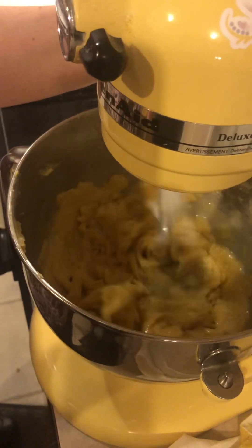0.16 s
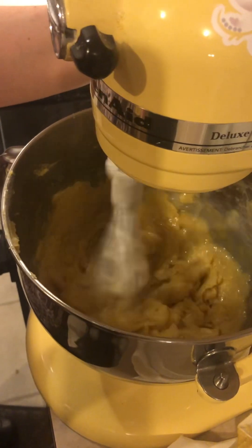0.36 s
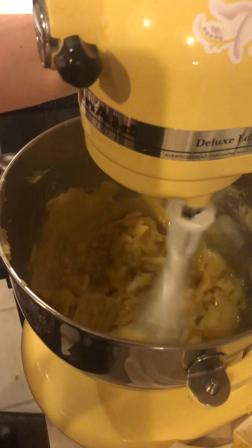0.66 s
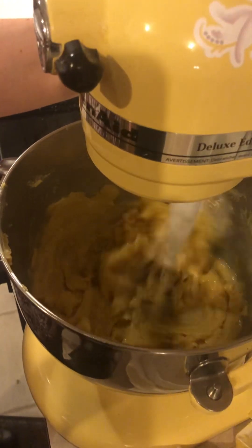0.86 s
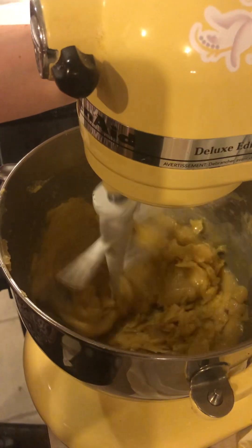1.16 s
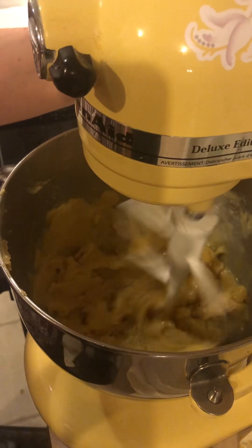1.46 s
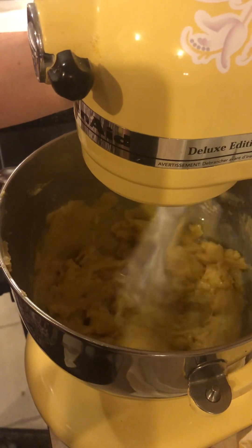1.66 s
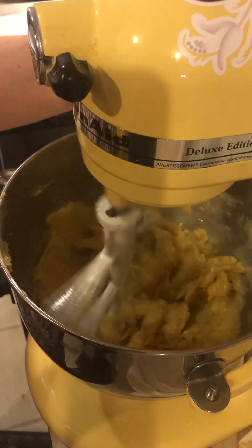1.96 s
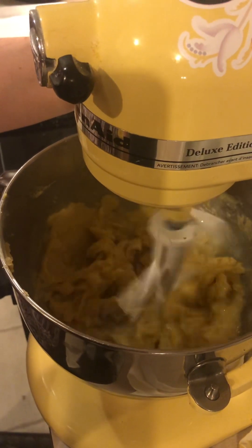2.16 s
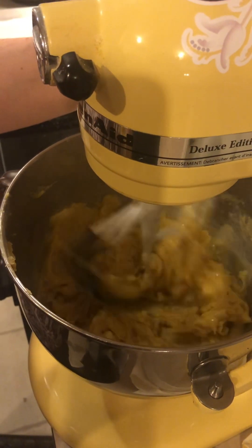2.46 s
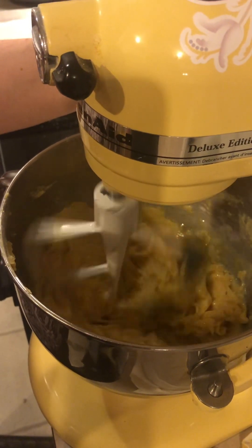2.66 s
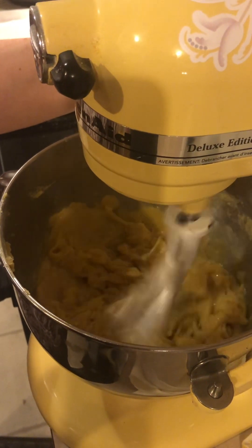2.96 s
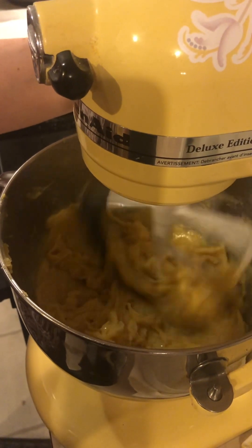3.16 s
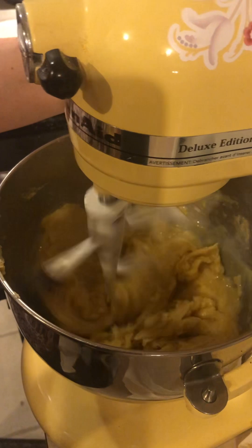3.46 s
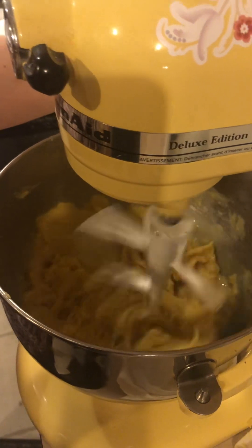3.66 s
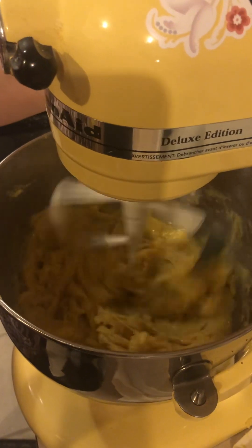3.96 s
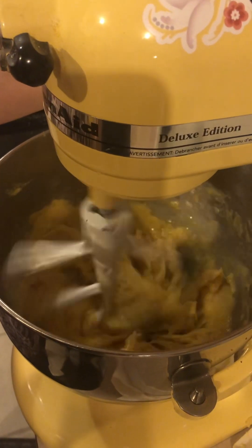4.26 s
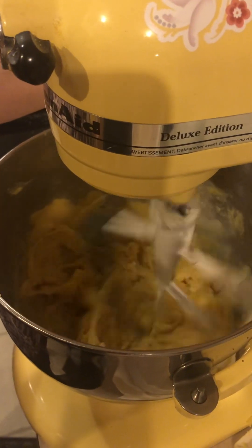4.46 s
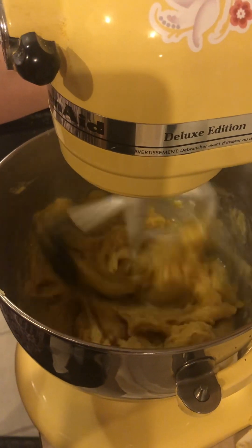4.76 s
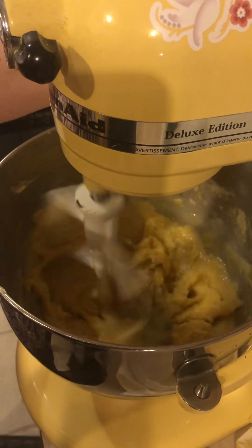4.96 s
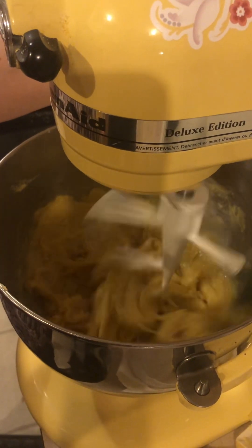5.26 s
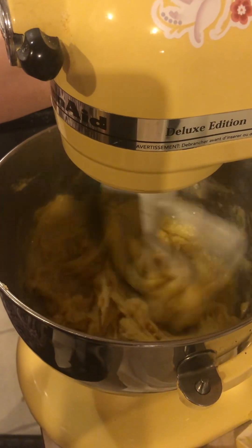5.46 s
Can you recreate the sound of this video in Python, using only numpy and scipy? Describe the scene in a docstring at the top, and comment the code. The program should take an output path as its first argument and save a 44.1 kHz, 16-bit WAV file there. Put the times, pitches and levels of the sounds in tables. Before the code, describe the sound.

An electric stand mixer is already running at the start and continues unbroken to the end, about 5.6 seconds, heard close and centred with only tiny reflections from the bowl and worktop. A piercing, slightly fluttering gear whine near 770 Hz dominates, with a weaker octave, rough higher overtones and many thin motor tones. It swells about every 0.77 seconds as the beater circles through thick dough. Pitch dips briefly on lumps, notably around 1.5, 2.3, 3.65 and 4.2 seconds, the 3.65 one swelling loudest; it jumps slightly higher near 1.2, 2.3, 3.6 and 4.25 as the blade slips free. A bright, grainy brush hiss with metallic housing ring lies over gear rattle, a low rush and faint electric hum. Small sticky dough smacks stay buried. One short, dull tick on the bowl comes at about 3.15 seconds. The whine grows gradually stronger towards the end.

```python
"""A stand mixer whines close by at one speed while its beater turns thick dough in a steel bowl.
The whine is gear teeth meshing: it swells once a lap, sags on lumps and races as a blade slips free.
Tones tied to the motor shaft and a fixed electric hum lie around it; the gears rattle and rush.
Brushes hiss as shaped noise and ring the housing, the dough smacks softly, and the beater ticks the bowl.
Short reflections from bowl and worktop colour the hiss and the tick."""
import sys
import numpy as np
from scipy import signal
from scipy.fft import rfft, irfft, next_fast_len
from scipy.io import wavfile
from scipy.ndimage import uniform_filter1d, map_coordinates

SR = 44100
rng = np.random.default_rng(int(sys.argv[2]) if len(sys.argv) > 2 else 0)


def persist_wave(psi):
    """Save psi, clipped to +-1, as 16-bit WAV."""
    counts = np.round(np.clip(psi, -1, 1) * 32767).astype(np.int16)
    wavfile.write(sys.argv[1], SR, np.atleast_2d(counts).T)


N = 247401  # length of the sound in samples

SHAFT_HZ = 76.67  # the motor shaft's set speed, turns a second
# The beater circles the bowl (laps a second) and meets the thickest dough once a lap, first at this time.
ORBIT_HZ, THICKEST_S = 1.303, 0.345
# The worm wheel turns once in six shaft turns; its one tight spot first comes round at this time.
WHEEL_HZ, WHEEL_S = SHAFT_HZ / 6, 0.053


def amp(db):
    """Turn decibels into a gain."""
    return 10 ** (np.asarray(db) / 20)


def unit(x):
    """Scale a signal to rms 1."""
    return x / np.sqrt(np.mean(x ** 2) + 1e-20)


def along(points, hz):
    """Read a curve of (Hz, value) points at any frequency, on a log frequency axis."""
    point_hz, value = np.transpose(points)
    return np.interp(np.log(hz + 1), np.log(point_hz + 1), value)


def wobble(rate):
    """A smooth random curve with rate random points a second."""
    position = np.arange(N) * rate / SR
    return map_coordinates(rng.standard_normal(int(N * rate / SR) + 4), [position])


def cycle(rate, peak_s):
    """A steady rotation as a swing between -1 and 1, with a peak at peak_s."""
    return np.cos(2 * np.pi * rate * (np.arange(N) / SR - peak_s))


def bump(s, half_s):
    """A smooth rise and fall around time s, down to 1/e at half_s to either side."""
    return np.exp(-((np.arange(N) / SR - s) / half_s) ** 2)


def filtered(x, response):
    """Shape x by a response given as a function of frequency."""
    m = next_fast_len(N + SR // 2)  # room for the ringing to die out
    return irfft(rfft(x, m) * response(np.fft.rfftfreq(m, 1 / SR)), m)[..., :N]


def noise(spectrum, gate=1):
    """Noise of rms 1, its strength shaped by gate and then its colour by (Hz, dB) points."""
    return unit(filtered(gate * rng.standard_normal(N), lambda hz: amp(along(spectrum, hz))))


def tone(phase, rough, flutter_rate):
    """A tone of rms 1 whose strength and phase flutter by the share rough."""
    steady = 1 + rough * (wobble(flutter_rate) + 1j * wobble(flutter_rate))
    return unit(np.real(steady * np.exp(1j * phase)))


def working(start_db, rise_db_per_s, orbit_db, lag_s, wander_db, wander_rate):
    """Level in dB of one part: it creeps up, and swells once a lap, lag_s after the thickest dough."""
    orbit = cycle(ORBIT_HZ, THICKEST_S + lag_s)
    creep_db = start_db + rise_db_per_s * np.arange(N) / SR
    return creep_db + orbit_db * orbit + wander_db * wobble(wander_rate)


def kneading():
    """Lumps brake the shaft and swell the whine; slips let it race and thin the tone.

    Gives the slowing [Hz], the racing [Hz], and the changes of whine and octave [dB]."""
    # The beater catches a lump:
    # (time [s], half-length [s], shaft slows by [Hz], whine swells by [dB])
    snags = [(0.82, 0.033, 0.37, 3), (1.0, 0.08, 0.17, 1.5), (1.521, 0.024, 0.67, 3.5),
             (1.846, 0.019, 0.38, 0), (2.063, 0.022, 0.3, 2.5), (2.339, 0.056, 0.92, 3.0),
             (2.583, 0.049, 0.41, 2), (3.38, 0.03, 0.48, 0.5), (3.65, 0.048, 1.64, 8),
             (3.952, 0.0803, 0.554, 2.2), (4.21, 0.056, 1.27, 4.5), (4.87, 0.021, 0.14, 2.0),
             (5.101, 0.028, 0.23, 2.5), (5.55, 0.051, 0.32, 1.3)]
    # A blade slips free of the dough: (time [s], shaft gains [Hz], whine's octave drops by [dB])
    slips = [(0.05, 0.24, 15), (0.24, 0.0058, 8.5), (0.46, 0.016, 4.3), (0.75, 0.04, 6.9), (1.16, 0.5, 1.7),
             (1.38, 0.02, 4), (1.98, 0.44, 4), (2.3, 0.73, 7), (2.75, 0.38, 10), (2.99, 0.0, 7.2),
             (3.26, 0.094, 13), (3.63, 1.0, 8), (3.81, 0.66, 5.5), (4.07, 0.22, 4), (4.24, 0.99, 6.4),
             (4.55, 0.15, 6), (5.04, 0.24, 10), (5.22, 0.11, 8)]
    slip_s = 0.055  # half-length of every slip
    slack_db_per_hz = 3.5  # the whine eases as the shaft runs free
    octave_db_per_hz = 2  # the teeth press harder as the shaft is slowed
    sag = sum(slows * bump(s, half_s) for s, half_s, slows, db in snags)
    swell_db = sum(db * bump(s, half_s) for s, half_s, slows, db in snags)
    race = sum(gains * bump(s, slip_s) for s, gains, db in slips)
    drop_db = sum(db * bump(s, slip_s) for s, gains, db in slips)
    whine_load_db = swell_db - slack_db_per_hz * race
    octave_load_db = octave_db_per_hz * sag - drop_db
    return sag, race, whine_load_db, octave_load_db


def gears(angle, sag, whine_load_db, octave_load_db):
    """The gears follow the beater's orbit, the load of the dough and the turn of the worm wheel."""
    wheel = cycle(WHEEL_HZ, WHEEL_S)
    whine_db = working(start_db=-25.5, rise_db_per_s=0.67, orbit_db=2.0, lag_s=0,
                       wander_db=0.58, wander_rate=22)
    # the whine pulses as the beater's edges sweep past the bowl wall
    edge_sweep_db = 0.67 * cycle(rate=7.53, peak_s=0.061)
    whine_db = whine_db + whine_load_db + edge_sweep_db
    octave_db = working(start_db=-37, rise_db_per_s=0.57, orbit_db=0.5, lag_s=-0.32,
                        wander_db=1.2, wander_rate=20)
    octave_db = octave_db + octave_load_db
    rattle_db = working(start_db=-39.0, rise_db_per_s=0.16, orbit_db=0.3, lag_s=-0.072,
                        wander_db=1.2, wander_rate=20)
    # slowed teeth press harder and rattle more
    rattle_db = rattle_db + 1.5 * sag + 0.76 * wheel
    third_db = working(start_db=-46.5, rise_db_per_s=0.37, orbit_db=1.8, lag_s=0,
                       wander_db=2.5, wander_rate=18)
    third_db = third_db + 2 * sag
    fourth_db = working(start_db=-46.0, rise_db_per_s=0.93, orbit_db=2.5, lag_s=-0.17,
                        wander_db=1.7, wander_rate=19)
    fourth_db = fourth_db + 1.4 * wheel
    whine = gear_whine(angle, whine_db, octave_db)
    chatter = tooth_chatter(angle, third_db, fourth_db)
    return whine + chatter + gearbox(angle, rattle_db)


def gear_whine(angle, whine_db, octave_db):
    """Ten teeth mesh per shaft turn; a buzz in the motor's torque puts side tones around the whine."""
    # Side tones: (multiple of the mesh, multiple of the buzz, level relative to the whine [dB])
    side_tones = [(1, -1, -30), (1, 1, -30), (1, 2, -29.5), (2, -2, -33.5), (2, 2, -31.5)]
    buzz_hz = 200.2
    mesh = 10 * angle
    buzz = 2 * np.pi * buzz_hz * np.arange(N) / SR
    whine = amp(whine_db) * amp(0.75 * wobble(32)) * tone(mesh, rough=0.05, flutter_rate=45)
    sides = 0
    for m, b, db in side_tones:
        sides = sides + amp(whine_db + db) * tone(m * mesh + b * buzz, rough=0.46, flutter_rate=25)
    octave = amp(octave_db) * tone(2 * mesh, rough=0.43, flutter_rate=38)
    return whine + sides + octave


def tooth_chatter(angle, third_db, fourth_db):
    """The teeth bounce, sounding three and four times the mesh pitch as rough, flaring tones."""
    mesh = 10 * angle
    third = amp(third_db) * tone(3 * mesh, rough=0.9, flutter_rate=110)
    fourth = amp(fourth_db) * tone(4 * mesh, rough=0.6, flutter_rate=95)
    return third + fourth


def gearbox(angle, rattle_db):
    """Fan and gears rush; the teeth scrape once per mesh, harder on one side of each turn."""
    # Colour of the scraping teeth: (frequency [Hz], relative level [dB per Hz])
    rattle_colour = [(1200, -51), (1750, -14), (2080, -4), (2260, 3.5), (2520, -4), (2800, 2.5), (3400, -5),
                     (4500, -26)]
    # Colour of the gear and fan rush: (frequency [Hz], relative level [dB per Hz])
    rush_colour = [(25, -43), (45, -28), (70, -17.5), (110, -22.5), (222, -14), (247, -0.5), (285, -15),
                   (410, -1.5), (490, -14.5), (630, -12.5), (750, 5.5), (920, -15.5), (1100, -8),
                   (1220, -10.5), (1430, -0.5), (1680, -15), (2400, -31)]
    each_mesh = np.abs(1 + 0.16 * np.cos(10 * angle))
    each_turn = amp(0.63 * np.cos(angle) + 0.43 * np.cos(2 * angle))
    rattle = amp(rattle_db) * noise(rattle_colour, each_mesh * each_turn)
    rush = amp(-35.0 + 1.0 * wobble(12)) * noise(rush_colour)
    return rattle + rush


def shaft_orders(angle):
    """Slots, commutator bars, bearings and gear teeth sing at multiples of the shaft speed."""
    # Tones tied to the shaft: (multiple of the shaft speed, level before it wavers [dB rms])
    orders = [(5, -48), (9, -65), (9.5, -47), (18, -66), (19, -61), (24, -63), (28, -63), (29, -49.5),
              (32, -67), (35, -50.5), (37, -54.5), (44, -62), (48, -45), (50, -49.5), (52, -40.5),
              (56, -67), (59, -44), (60, -41), (64, -39), (66, -45), (72, -51), (82.4, -44), (88, -47)]
    play = 0.0078 * wobble(22)  # backlash lets the shaft run a little ahead or behind [radians]
    total = 0
    for k, db in orders:
        # the high ones flutter most
        line = tone(k * (angle + play), rough=0.042 * np.sqrt(k), flutter_rate=36)
        total = total + amp(db + 0.72 * wobble(6)) * line
    return total


def brushes(angle, ring_db, hiss_db):
    """Carbon brushes rub over the commutator bars and ring the cast housing."""
    # Colour of the brush hiss: (frequency [Hz], relative level [dB per Hz])
    hiss_colour = [(1500, -35), (3300, -8.5), (4200, -4.5), (4600, -0.5), (5000, -1.5), (5250, 0.5),
                   (6100, -0.5), (7100, -6), (8600, -2.5), (9500, -3.5), (10500, -7.5), (11700, -11.5),
                   (12700, -8.5), (14300, -14), (15700, -14)]
    # Housing resonances: (centre [Hz], half-width where 6 dB down [Hz], relative level [dB])
    resonances = [(5900, 57, -7), (6360, 55, 0), (6552, 142, 4), (6800, 56, -17), (7530, 74, -4),
                  (7770, 120, -10), (8380, 56, -1.5), (8820, 170, -14), (9200, 30, -14), (9800, 87, -6),
                  (10300, 200, -7.5), (12800, 220, -29), (13170, 140, -6.5), (14800, 120, -10)]
    bars = 1 + 0.15 * np.cos(12 * angle)  # twelve pulses per turn
    grip = amp(0.25 * wobble(70) + 0.2 * wobble(14))
    hiss = amp(hiss_db) * patchy(noise(hiss_colour, bars * grip), depth_db=0.84)

    def housing(f):
        """Sum of the resonances, each a band-pass applied twice."""
        total = 0
        for c, w, db in resonances:
            band = 2j * f * w / (c * c - f * f + 2j * f * w)
            total = total + amp(db) * band ** 2
        return total

    ring = unit(filtered(bars * rng.standard_normal(N), housing))
    return hiss + amp(ring_db) * ring


def patchy(x, depth_db):
    """Swirling cooling air: the colour of the hiss shifts in patches about a thousand Hz wide."""
    z = signal.stft(x, nperseg=256)[2]
    # random levels, smoothed over 6 frequency bins and then 26 time steps
    field = uniform_filter1d(rng.standard_normal(z.shape), size=6, axis=0)
    field = uniform_filter1d(field, size=26, axis=1)
    return signal.istft(z * amp(depth_db * unit(field)), nperseg=256)[1][:N]


def beater():
    """The beater ticks the bowl; dough damps the bowl, so each touch dies at once."""
    # Ticks against the bowl: (time [s], peak level before reflections [dB])
    ticks = [(3.153, -13)]
    # Ringing tones of the bowl: (frequency [Hz], relative level [dB], time to fall 60 dB [s])
    bowl_tones = [(1500, -3, .015), (1950, -6, 0.02), (2450, 1, 0.015), (3030, 6, 0.012), (3530, 6, 0.014)]
    t = np.arange(SR // 10) / SR
    out = np.zeros(N + SR)
    for s, db in ticks:
        ring = 0
        for hz, level, t60 in bowl_tones:
            decay = amp(level - 60 * t / t60)
            ring = ring + decay * np.sin(2 * np.pi * (hz * t + rng.random()))
        out[round(s * SR):][:len(t)] += amp(db) * ring / np.abs(ring).max()
    return out[:N]


def dough(speed):
    """Sticky little smacks, random bursts of noise, strongest while the shaft runs slow."""
    # Colour of the smacks: (frequency [Hz], relative level [dB per Hz])
    smack_colour = [(150, -36), (400, -9), (1200, -3), (3000, 12), (8000, -17)]
    load = np.clip(unit(speed.mean() - speed), -2, 2)
    smacks = amp(2.2 * load + 2 * wobble(25) + 3.2 * wobble(400))
    return amp(-46) * noise(smack_colour, smacks)


def hum():
    """The field coils hum at fixed pitches, whatever the shaft does."""
    # Electric hum: (frequency [Hz], level [dB rms])
    hum_tones = [(60, -69), (200, -59.5), (240, -60), (360, -47), (480, -59.5)]
    t = np.arange(N) / SR
    total = 0
    for hz, db in hum_tones:
        phase = 2 * np.pi * (hz * t + rng.random())
        total = total + amp(db) * tone(phase, rough=0.12, flutter_rate=8)
    return total


def enclosure(x):
    """Dense short reflections between bowl, head and worktop, made from a fading burst of noise."""
    # How long the reflections last: (frequency [Hz], time to fall 60 dB [s])
    decay_times = [(200, .12), (2000, 0.14), (12000, 0.057)]
    hz, t, z = signal.stft(rng.standard_normal(SR // 4), SR, nperseg=256)
    fade = amp(-60 * t / along(decay_times, hz)[:, None])  # each band fades at its own rate
    tail = signal.istft(z * fade, SR, nperseg=256)[1]
    return signal.fftconvolve(x, tail / np.linalg.norm(tail))[:N]


def scene():
    """One shaft drives all but the hum and the bowl ticks; both channels carry the same sound."""
    sag, race, whine_load_db, octave_load_db = kneading()
    # the speed also wanders a little around its setting [Hz]
    speed = SHAFT_HZ - sag + race + 0.1402 * wobble(20)
    angle = 2 * np.pi * np.cumsum(speed) / SR
    ring_db = working(start_db=-33.0, rise_db_per_s=0.42, orbit_db=0.5, lag_s=-0.13,
                      wander_db=1.2, wander_rate=16)
    hiss_db = working(start_db=-27.5, rise_db_per_s=0.21, orbit_db=0.15, lag_s=-0.12,
                      wander_db=0.29, wander_rate=16)
    hiss_db = hiss_db + 0.23 * cycle(WHEEL_HZ, WHEEL_S)
    drive = gears(angle, sag, whine_load_db, octave_load_db) + shaft_orders(angle) + hum()
    bright = brushes(angle, ring_db, hiss_db) + beater()
    mono = drive + dough(speed) + bright + amp(-9.5) * enclosure(bright)
    return np.array([mono, mono])


def record(dry):
    """Keep only what lies below a sharp band limit."""
    top_hz = 15750
    return filtered(dry, lambda hz: hz < top_hz)


dry = scene()
out = record(dry)
persist_wave(out)
```